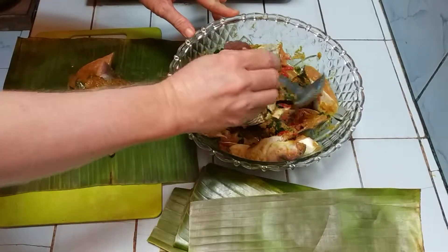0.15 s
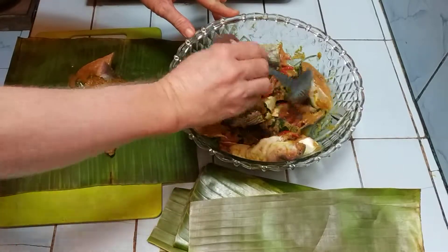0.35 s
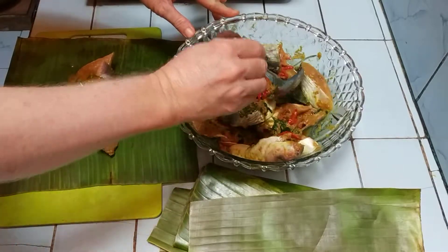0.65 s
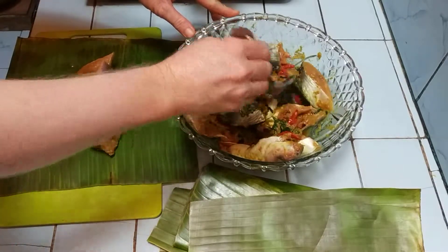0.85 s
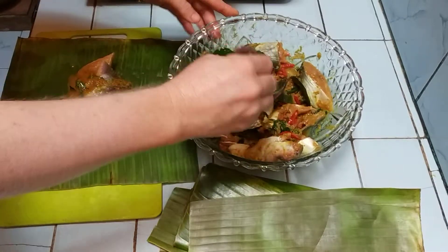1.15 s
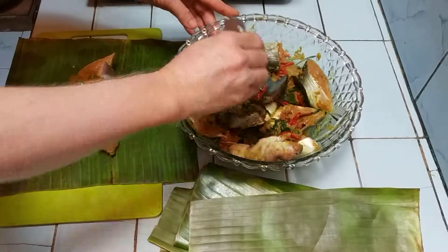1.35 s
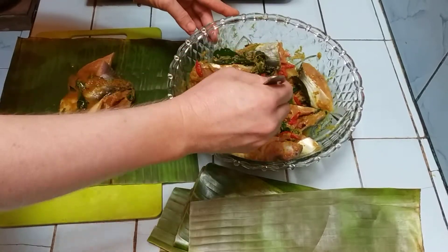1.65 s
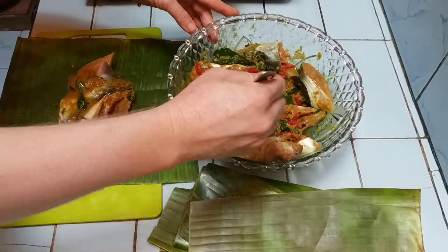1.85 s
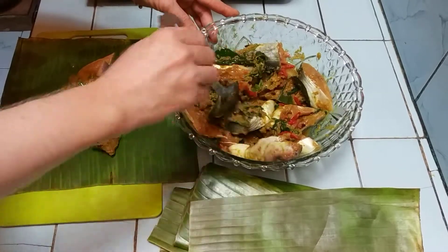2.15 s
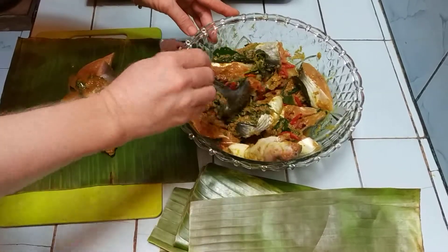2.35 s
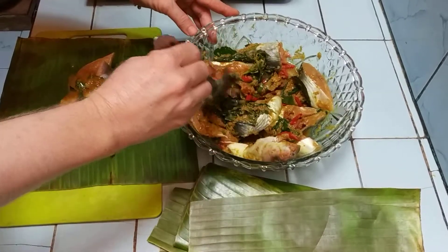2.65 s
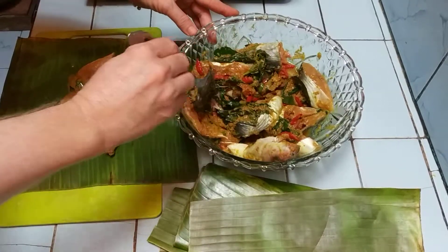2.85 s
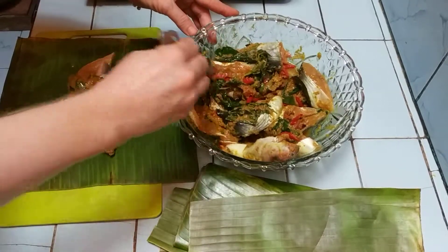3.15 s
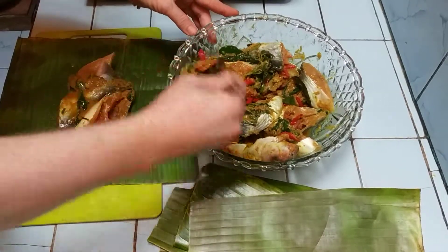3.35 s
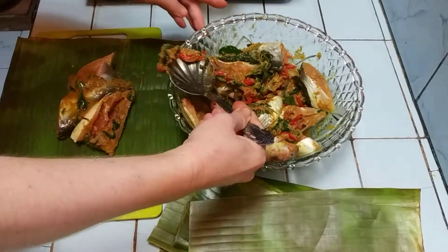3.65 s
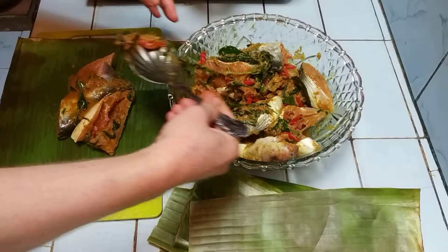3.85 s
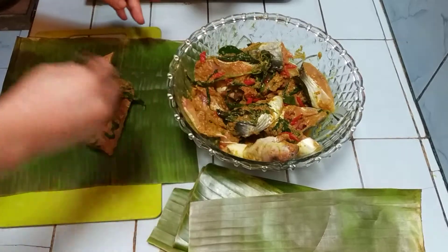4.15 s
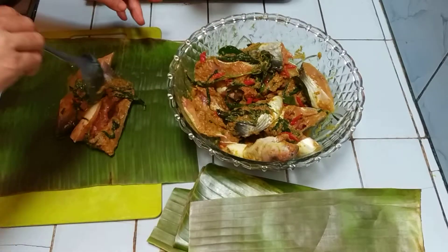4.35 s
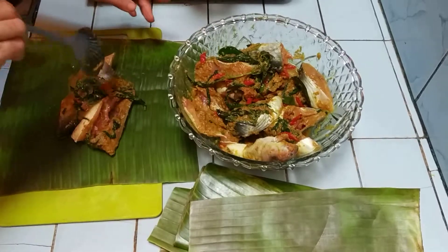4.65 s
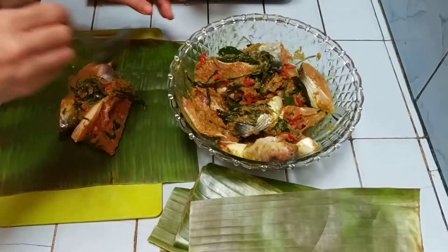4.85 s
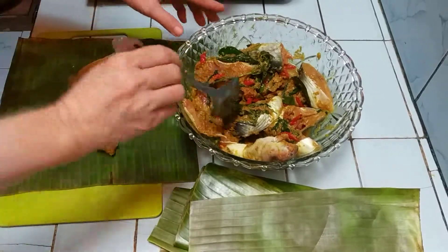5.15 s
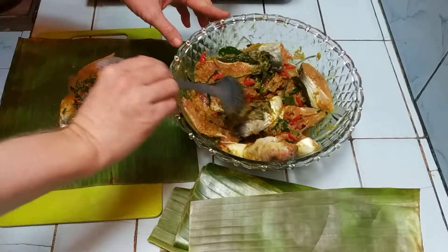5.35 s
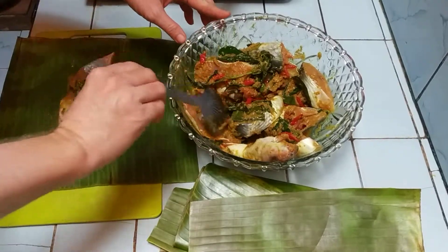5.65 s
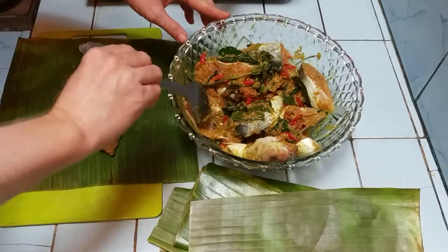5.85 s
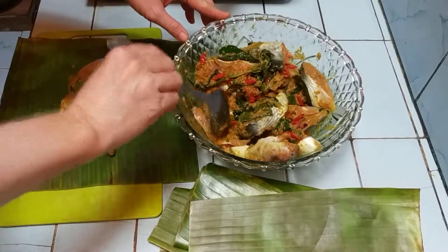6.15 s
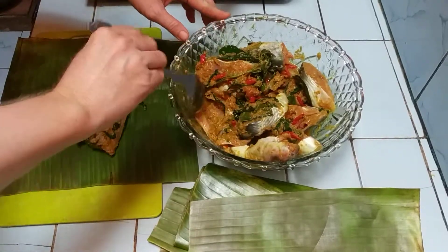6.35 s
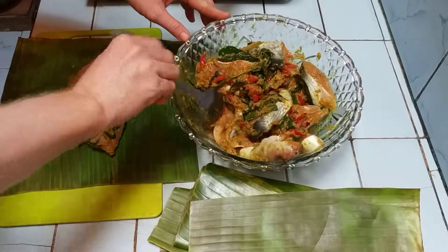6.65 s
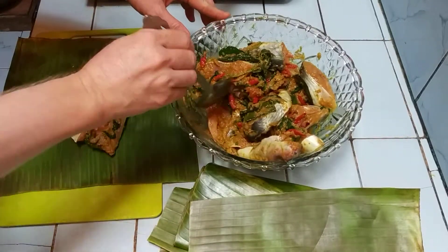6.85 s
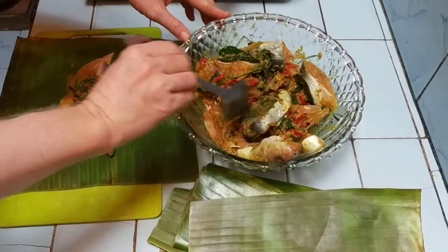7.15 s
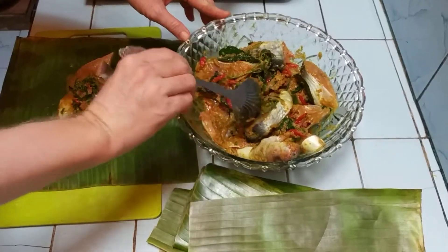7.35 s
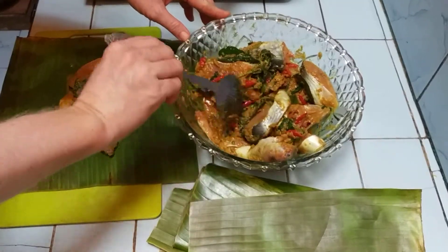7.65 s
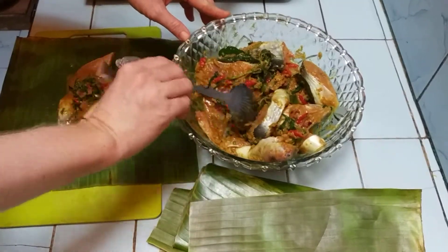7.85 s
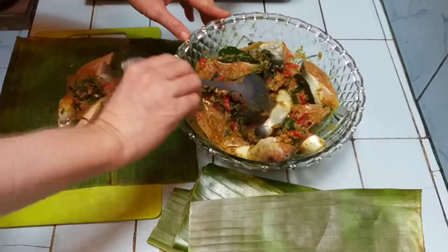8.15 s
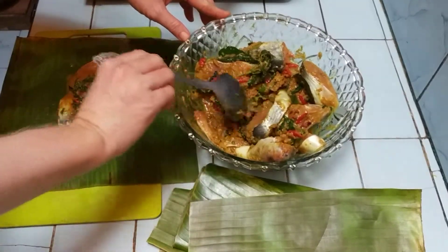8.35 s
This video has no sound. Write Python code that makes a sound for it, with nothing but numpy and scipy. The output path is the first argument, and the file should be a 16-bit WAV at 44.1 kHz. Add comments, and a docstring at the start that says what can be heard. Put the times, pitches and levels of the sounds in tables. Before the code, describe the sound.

A small, tiled kitchen holds a steady low rush of air and a faint hiss, heard close in stereo. A steel spoon works through wet, saucy food with fine crackles, tiny bubble pops and light clicks. The heavy glass bowl rocks on the counter with resonant thuds at about 0.4, 1.0, 1.1, 1.3 and 1.5 seconds. Sharper ticks come near 1.6 and 2.7, then short hollow, raspy scrapes around 3.05 to 3.3. At 4.0 a spoonful lands on a leaf-covered board in dull wet slaps with a low boom. A quieter stretch follows, with four faint grainy hiss swells from 4.2 to 5.4. Bowl knocks resume at 5.7 and 6.4; a bright glass clink rings at 6.4, with another contact at 6.5 damping it. A very brief sinking squeak comes at 6.8, then crackles, ticks and muffled thuds from 7.2 to the end.

```python
"""A low rush and a faint hiss fill a small hard kitchen as a steel spoon digs through crackling wet food.
Its heavy glass bowl rocks and knocks on the tiled counter: resonant thuds, noise clacks and decaying modes.
A spoonful tumbles onto a leaf on a board: grain slaps over a boom; narrow grainy hiss then swells four times.
Later the spoon clinks on the rim (modal ring and crack) and squeaks along the glass (a sinking tone).
Light clicks and a faint singing of the spoon come between; decaying noise makes the room's answer."""
import sys
import numpy as np
from scipy import signal
from scipy.fft import rfft, irfft, next_fast_len
from scipy.io import wavfile
from scipy.ndimage import map_coordinates

SR = 44100
rng = np.random.default_rng(int(sys.argv[2]) if len(sys.argv) > 2 else 0)


def waveform_to_disk(signal):
    """Save audio, clipped to [-1, 1], as 16-bit WAV at the path in sys.argv[1]."""
    frames = np.transpose(np.atleast_2d(signal))
    scaled = np.clip(frames, -1, 1) * 32767
    samples = np.round(scaled).astype(np.int16)
    wavfile.write(sys.argv[1], SR, samples)


N = 374318


def amp(db):
    """Decibels to gain."""
    return 10 ** (np.asarray(db) / 20)


def unit(x):
    """Scale to rms 1."""
    return x / np.sqrt(np.mean(x ** 2) + 1e-20)


def clock(size):
    """Seconds for each sample."""
    return np.arange(size) / SR


def along(points, hz):
    """Interpolate (Hz, value) points on a log axis."""
    f, v = np.transpose(points)
    return np.interp(np.log(hz + 1), np.log(f + 1), v)


def wobble(rate):
    """A smooth random curve, rate knots a second."""
    knots = rng.standard_normal(int(N * rate / SR) + 4)
    return map_coordinates(knots, [clock(N) * rate])


def filtered(x, response):
    """x times a complex response of frequency."""
    size = x.shape[-1]
    m = next_fast_len(size + SR // 4)
    return irfft(rfft(x, m) * response(np.fft.rfftfreq(m, 1 / SR)), m)[..., :size]


def resonance(f, centre, width):
    """Causal response of one resonance."""
    return 1j * f * width / (centre ** 2 - f ** 2 + 1j * f * width)


def add(track, s, sound):
    """Mix a sound in at time s."""
    part = track[..., max(0, round(s * SR)):][..., :sound.shape[-1]]
    part += sound[..., :part.shape[-1]]


def swell(s, db, rise, t60, hold=0):
    """A level that builds up to time s, holds and then dies away."""
    t = clock(N) - s
    build = np.exp(-(t / rise) ** 2 / 2)
    decay = amp(-60 * np.maximum(t - hold, 0) / t60)
    return amp(db) * np.where(t < 0, build, decay)


def grains(rate):
    """Random tiny impulses, rate a second."""
    return rng.standard_normal(N) * (rng.random(N) < rate / SR)


def ring(modes, t, scatter_db):
    """Decaying modes, each reaching the two microphones with its own strength and phase."""
    out = np.zeros((2, len(t)))
    for hz, db, t60 in modes:
        phase = rng.uniform(0, 2 * np.pi) + rng.normal(0, 0.87, (2, 1))
        level = amp(db + rng.normal(0, scatter_db, (2, 1)) - 60 * t / t60)
        out += level * np.sin(2 * np.pi * hz * t + phase)
    return out


# left-right likeness of diffuse sound: freq_hz, likeness (0-1)
LIKENESS = [(60, 0.94), (250, 0.91), (500, 0.83), (1000, 0.15), (3000, 0.029), (12000, 0.014)]


def diffuse(size):
    """White stereo noise from all around: alike in the bass, unrelated in the treble."""
    def mid_side_gains(hz):
        turn = np.arccos(np.clip(along(LIKENESS, hz), -1, 1)) / 2
        return np.array([np.cos(turn), np.sin(turn)])
    mid, side = filtered(rng.standard_normal((2, size)), mid_side_gains)
    return np.array([mid + side, mid - side])


# kitchen reverberation: freq_hz, t60_s
KITCHEN_DECAY = [(100, 0.39), (500, 0.22), (1200, 0.29), (2400, 0.44), (7000, 0.32), (14000, 0.4)]


def in_room(x, wet_db, lag_s=0.000095):
    """A short sound, reaching the left microphone a little late, and the kitchen's answer."""
    hz, t, z = signal.stft(diffuse(SR // 2), SR, nperseg=256)
    build = 1 - np.exp(-(t / 0.00067) ** 2)
    decay = amp(-60 * t / along(KITCHEN_DECAY, hz)[:, None])
    tail = signal.istft(z * build * decay, SR, nperseg=256)[1]
    echo = signal.fftconvolve(np.atleast_2d(x), tail / np.linalg.norm(tail[0]), axes=1)
    # half the lag each way
    direct = filtered(x, lambda f: np.exp(-1j * np.pi * f * lag_s * np.array([[1], [-1]])))
    return direct + amp(wet_db) * echo[:, :x.shape[-1]]


# steady low air spectrum: freq_hz, relative_db
RUSH_SPECTRUM = [(12, -8), (21, 1.5), (35, -1.5), (70, -13), (141, -6.5), (230, -17), (300, -11.5),
                 (450, -8), (650, -23), (800, -15), (1100, -21.5), (1500, -30), (2200, -63), (3300, -80)]
# room resonances in that air: centre_hz, width_hz, relative_db
DRONE_MODES = [(141.7, 51, -5.5), (429.7, 19.3, 2.5), (575.8, 40, -4)]
# hiss spectrum: freq_hz, relative_db
HISS_SPECTRUM = [(710, 6), (1200, 1.5), (1610, 2), (1890, 3.5), (2040, 2), (2680, -2.5), (3080, -4),
                 (4600, -7), (9010, 0), (14500, -2), (16000, -6.5)]
RUSH_DB, DRONE_DB, HISS_DB = -44.5, -51, -49


def background():
    """A gently drifting low rush of air, coloured by room resonances, and an even hiss."""
    def drone_response(f):
        return sum(amp(db) * resonance(f, hz, width) ** 2 for hz, width, db in DRONE_MODES)
    rush = unit(filtered(diffuse(N), lambda f: amp(along(RUSH_SPECTRUM, f))))
    drone = unit(filtered(diffuse(N), drone_response))
    hiss = unit(filtered(diffuse(N), lambda f: amp(along(HISS_SPECTRUM, f))))
    drift_db = wobble(7.4)
    return amp(RUSH_DB + drift_db) * rush + amp(DRONE_DB) * drone + amp(HISS_DB) * hiss


# spoon pushes through the sauce: height_s, crackle_db
SAUCE_STROKES = [(0.01, -48), (.45, -57), (.54, -50), (.785, -52), (1.16, -60), (1.31, -53), (1.64, -59),
                 (2.47, -53), (3.07, -59), (3.24, -52.5), (4.04, -51.5), (7.11, -51.5), (7.2, -53),
                 (7.46, -54), (7.63, -54), (7.98, -60)]
# largest bubbles burst: start_s, level_db, pitch_hz
LARGE_POPS = [(.7778, -33, 5360), (1.135, -37, 7840), (1.171, -24.5, 6630), (2.957, -25, 5980),
              (5.7065, -34, 4700)]
STROKE_RISE_S, STROKE_T60_S = 0.017, 0.27
SETTLING_DB = -52.5  # crackle between pushes
BUBBLES_PER_S, BUBBLE_HZ = 7, 8960
BUBBLE_LOG_SPREAD = 0.23
BUBBLE_DB = 10  # small bubbles, over the crackle level


def sauce():
    """Each push of the spoon makes the sauce crackle in clumps, and bubbles burst with a tiny ping."""
    pushes = sum(swell(s, db, STROKE_RISE_S, STROKE_T60_S) for s, db in SAUCE_STROKES)
    stir = amp(SETTLING_DB) + pushes
    clumping = amp(4 * np.tanh(.5 * wobble(22) + wobble(70)))
    clumps = np.array([grains(rate=680), grains(rate=600)]) * clumping
    wet_grains = filtered(clumps, lambda f: resonance(f, 7870, 15400) ** 2)
    crackle = unit(in_room(wet_grains, wet_db=5.0))

    large, small, t = np.zeros(N), np.zeros(N), clock(SR // 20)
    ping_level = amp(-60 * t / 0.018) * (1 - np.exp(-t / 0.0007))

    def ping(hz):
        return ping_level * np.sin(2 * np.pi * hz * t)
    for s, db, hz in LARGE_POPS:
        add(large, s, amp(db) * ping(hz))
    pitches_hz = BUBBLE_HZ * np.exp(BUBBLE_LOG_SPREAD * rng.standard_normal(N))
    for i in np.flatnonzero(rng.random(N) < BUBBLES_PER_S / SR):
        add(small, i / SR, ping(pitches_hz[i]))
    bubbles = large + amp(BUBBLE_DB) * stir * small
    return stir * crackle + in_room(bubbles, wet_db=-11)


# bowl rocks onto the counter, at times touching twice:
# start_s, level_db, boom_relative_db, thud_hz, clack_relative_db
BOWL_KNOCKS = [(0.3625, -33, -2, 480, -18), (0.3971, -15, -5, 500, -19), (0.3999, -21.5, -10, 800, -9),
               (.9573, -23.5, 7.5, 510, -9), (0.9604, -14.5, -1, 630, -9.5), (1.1001, -15, -4.5, 457, -15),
               (1.3383, -25, 9, 460, -3), (1.3433, -17, 0, 463, -10.5), (1.3565, -24.5, 12.5, 600, -9),
               (1.5114, -16, -6, 460, -16), (5.6997, -19, -2, 550, -20), (5.7028, -31.5, -6, 655, -2),
               (6.4374, -16.5, -0.5, 450, -12), (7.2776, -23.5, 6, 496, -21), (7.4187, -29.5, 11, 350, -10),
               (7.5721, -15, -4, 470, -11), (7.9485, -19, -6, 470, -12), (8.1093, -29, -9, 392, -19),
               (8.365, -24, -6, 486, -27)]
# bowl and counter modes together: freq_hz, relative_db, t60_s
BODY_MODES = [(194, -12.5, 0.19), (286, -1.5, 0.12), (320, -4, 0.18), (402, -12.5, 0.36),
              (456, -1.5, 0.066), (522.5, 3, 0.096), (609, 5.5, 0.042), (665, 3, 0.054), (960, -15, 0.11),
              (1220, -27, 0.084), (1530, -27, 0.028), (1830, -23, .05)]
# reflections off nearby tiled walls: delay_s, relative_db
WALL_ECHOES = [(.00465, -3.5), (.016, -11.5), (0.0267, -18.5)]


def knocks(soft_hz=1100, clack_hz=1250, clack_width_hz=1500, clack_t60_s=0.014,
           thud_width_hz=760, low_hz=90, boom_hz=94):
    """The bowl's foot drops on the tiles: a round thud, a hard clack and a short ring, off the walls too."""
    out, t = np.zeros((2, N)), clock(SR // 2)
    impulse = 1. * (t == 0)

    def walls(f):
        return 1 + sum(amp(db) * np.exp(-2j * np.pi * f * delay) for delay, db in WALL_ECHOES)
    for s, db, boom_db, thud_hz, clack_db in BOWL_KNOCKS:
        burst = amp(-60 * t / clack_t60_s) * rng.standard_normal(len(t))
        clack = filtered(burst, lambda f: resonance(f, clack_hz, clack_width_hz) ** 3)
        thud = filtered(impulse, lambda f: resonance(f, thud_hz, thud_width_hz) ** 3 / (1 + 1j * f / 3000))
        modes = sum(amp(level + rng.normal(0, 3.0) - 60 * t / t60) * np.sin(2 * np.pi * hz * t)
                    for hz, level, t60 in BODY_MODES)
        body = 0.22 * filtered(modes, lambda f: 1 / (1 + 1j * f / soft_hz) ** 2)
        contact = thud / np.abs(thud).max() + amp(clack_db) * clack / np.abs(clack).max() + body
        knock = -filtered(contact, lambda f: (1j * f / (low_hz + 1j * f)) ** 2)
        reflected = filtered(knock / np.abs(knock).max(), walls)
        boom = amp(boom_db - 24.5 - 60 * t / 0.5) * np.sin(2 * np.pi * boom_hz * t)
        add(out, s, amp(db) * (in_room(reflected, wet_db=-4.0, lag_s=0.00024) + boom))
    return out


# spoon slides over the glass: height_s, level_db
GLASS_DRAGS = [(.43, -51), (5.48, -45.5), (7.98, -49.5)]
DRAG_HZ, DRAG_WIDTH_HZ, DRAG_RISE_S, DRAG_T60_S = 7140, 100, 0.019, 0.13


def drags():
    """Sliding over the glass keeps the spoon's strongest mode singing faintly."""
    zing = unit(filtered(grains(rate=760), lambda f: resonance(f, DRAG_HZ, DRAG_WIDTH_HZ) ** 2))
    level = sum(swell(s, db, DRAG_RISE_S, DRAG_T60_S) for s, db in GLASS_DRAGS)
    return in_room(zing * level, wet_db=-6)


# light touches of the spoon's edge: start_s, level_db, centre_hz, clack_relative_db
EDGE_TICKS = [(.7776, -28.5, 9400, -16), (1.0166, -31, 12500, -20), (1.4012, -21.5, 7000, 1),
              (1.6266, -16, 11800, -20), (2.7110, -22.5, 8600, -13), (2.7285, -21.5, 8500, -11),
              (2.7715, -23, 8500, -14), (3.053, -29, 2900, -10), (3.0706, -27, 9000, -12),
              (4.165, -28, 8300, -6), (5.5313, -28, 7100, -8), (5.947, -34, 2200, -4),
              (6.789, -29, 9000, -12), (6.8185, -26, 3500, 0), (7.2225, -27.5, 1200, 6),
              (7.6352, -29.5, 3100, -10), (7.8865, -28.5, 12000, -20)]


def ticks(clack_hz=1500):
    """The spoon's edge grazes the glass too lightly to ring it; a dull clack lies under each click."""
    out, t = np.zeros((2, N)), clock(SR // 2)
    fade = amp(-60 * t / .016)
    for s, db, hz, clack_db in EDGE_TICKS:
        def colour(f):
            return resonance(f, hz, 0.35 * hz) + amp(clack_db) * resonance(f, clack_hz, clack_hz) ** 2
        click = filtered(fade * rng.standard_normal((2, len(t))), colour)
        add(out, s, amp(db) * in_room(click / np.abs(click).max(), wet_db=-5.5))
    return out


# spoon drags through the food: height_s, relative_db, rise_s, t60_s, centre_hz, rasp_relative_db
FOOD_SCRAPES = [(3.05, -32.5, 0.007, 0.16, 590, -3), (3.196, -32.5, 0.009, 0.17, 450, -6),
                (3.268, -43, 0.016, 0.64, 570, -1.5), (7.17, -58.5, 0.075, 0.22, 780, 9)]
# dry rasp spectrum: freq_hz, relative_db
RASP_SPECTRUM = [(200, -38), (900, 13.5), (2000, 8.5), (3500, -9.5), (6000, -29), (16000, -35)]


def scrapes():
    """The spoon drags through soft food: a hollow rub with a dry rasp above it."""
    out = np.zeros(N)
    for s, db, rise, t60, hz, rasp_db in FOOD_SCRAPES:
        friction = grains(rate=1800)
        rub = unit(filtered(friction, lambda f: resonance(f, hz, 0.7 * hz) ** 2))
        rasp = unit(filtered(friction, lambda f: amp(along(RASP_SPECTRUM, f))))
        out += swell(s, db, rise, t60) * (rub + amp(rasp_db) * rasp)
    return amp(-1) * in_room(out, wet_db=-3.0, lag_s=0.00033)


# lumps of the spoonful slide off and land: height_s, relative_db, rise_s, t60_s
LUMP_SLIDES = [(3.93, -39, 0.04, 0.48), (3.988, -29, 0.0028, 0.23), (4.039, -26.5, 0.024, 0.21),
               (4.095, -34, 0.028, 0.5)]
# wet slap spectrum: freq_hz, relative_db
MUSH_SPECTRUM = [(30, -32), (60, -20), (140, 0), (230, -19), (300, -11), (385, 3.5), (450, -5),
                 (600, -11.5), (790, -5), (950, -15), (1500, -19.5), (2100, -24.5), (5200, -35.5),
                 (12000, -47), (16000, -55)]
LANDING_S, BOOM_DB, BOOM_HZ = 4.003, -21, 94
BOOM_RISE_S, BOOM_HOLD_S, BOOM_T60_S = 0.011, 0.092, 0.39
UPPER_RATIO, UPPER_DB = 1.49, -16  # counter's second mode, over its first
FIRST_LUMP_S, FIRST_LUMP_DB = 3.935, -31  # lighter boom as the first lump arrives


def food(uneven_db=1.0):
    """The spoonful lands as a flurry of dull slaps, which chatter in step with the booming counter."""
    landing = swell(LANDING_S, BOOM_DB, BOOM_RISE_S, BOOM_T60_S, BOOM_HOLD_S)
    weight = landing + swell(FIRST_LUMP_S, FIRST_LUMP_DB, 0.011, BOOM_T60_S)
    phase = 2 * np.pi * np.cumsum(BOOM_HZ * (1 + 0.024 * wobble(24.88))) / SR
    sway = unit(filtered(rng.standard_normal(N), lambda f: resonance(f, 29, 30) ** 2))
    counter = np.sin(phase) + amp(UPPER_DB) * np.sin(UPPER_RATIO * phase) + 0.16 * sway
    boom = weight * amp(uneven_db * wobble(40)) * counter
    slaps = grains(rate=2200) * (1 + 0.57 * np.sin(phase))
    dull_slaps = filtered(slaps, lambda f: amp(along(MUSH_SPECTRUM, f)))
    mush = unit(in_room(dull_slaps, wet_db=3.0, lag_s=0.0003))
    return amp(1.0) * sum(swell(*slide) for slide in LUMP_SLIDES) * mush + boom


# faint narrow hiss swells: start_s, level_db, hold_s
HISS_SWELLS = [(4.233, -58.5, 0.17), (4.565, -60.5, .16), (4.91, -61, .19), (5.34, -58.5, 0.099)]
SWELL_HZ, SWELL_WIDTH_HZ, SWELL_RISE_S, SWELL_T60_S = 3280, 800, 0.028, 0.3


def hiss_swells():
    """Faint narrow hiss: grainy band-passed noise rising and fading four times."""
    clumps = np.array([grains(rate=900), grains(rate=900)]) * amp(5 * np.tanh(wobble(45)))
    band = unit(filtered(clumps, lambda f: resonance(f, SWELL_HZ, SWELL_WIDTH_HZ) ** 2))
    return band * sum(swell(s, db, SWELL_RISE_S, SWELL_T60_S, hold) for s, db, hold in HISS_SWELLS)


# main modes of the glass: freq_hz, relative_db, t60_s
GLASS_MODES = [(2184, -11, .37), (3085, -24, .3), (3389, -8, .42), (3426, -11, .3), (4810, -14, .27),
               (4863, -7.5, .28), (5677, -29, .3), (6500, -8, .24), (6980, -20, .2), (7198, -8, .23),
               (7284, -13, .18), (8328, -4, .22), (8374, -10.5, .24), (8802, -25, .25), (10392, -10.5, .2),
               (10775, -12, .22), (11620, -15, .14), (12620, -19, .16), (12940, -21, .2), (13350, -21, .14),
               (15400, -19, .13)]


def side_modes(db, spread_hz, life, count):
    """The cut pattern of the glass crowds weaker, shorter modes around each main one."""
    return [(hz + spread_hz * rng.standard_normal(), level + db, life * t60)
            for hz, level, t60 in GLASS_MODES for _ in range(count)]


# spoon strikes the rim, then lands on it; two faint dull claps follow:
# start_s, ring_relative_db, crack_relative_db, clack_relative_db
RIM_CLINKS = [(6.3972, -9, -9, -16), (6.5025, -23, -8.5, -5), (6.519, -39, -40, -12),
              (6.538, -44, -40, -13)]
# held spoon, quickly damped by the fingers: freq_hz, relative_db, t60_s
SPOON_MODES = [(1215, -26, 0.2), (1710, -19, 0.043), (2410, -19, 0.046), (6600, -9, 0.026),
               (7210, 1, 0.026), (8340, -8, 0.04), (10800, -10.5, .04), (13000, -16, 0.04)]
CHOKE_T60_S = .3  # extra decay from the resting spoon


def clinks(clack_hz=1900, clack_width_hz=2900):
    """Steel on glass: a crack, the spoon's zing and the bowl's ring, choked once the spoon stays on the rim."""
    out, t = np.zeros((2, N)), clock(SR // 2)
    modes = GLASS_MODES + side_modes(db=-15, spread_hz=140, life=0.55, count=6)
    landing_s = RIM_CLINKS[1][0]

    def burst(t60):
        return amp(-60 * t / t60) * rng.standard_normal((2, len(t)))

    def snap_response(f):
        return sum(amp(db / 2) * resonance(f, hz, 800) ** 2 for hz, db, t60 in GLASS_MODES)
    for s, ring_db, crack_db, clack_db in RIM_CLINKS:
        resting_s = np.maximum(s + t - landing_s, 0)
        choke = amp(ring_db - 5.5 - 60 * resting_s / CHOKE_T60_S)
        glass = choke * ring(modes, t, scatter_db=3.5)
        snap = filtered(burst(0.01), snap_response)
        crack = amp(crack_db) * (2.1 * snap + ring(SPOON_MODES, t, scatter_db=0))
        dull = filtered(burst(0.021), lambda f: resonance(f, clack_hz, clack_width_hz) ** 3)
        add(out, s, in_room(glass, wet_db=-7.5, lag_s=0.00009))
        add(out, s, in_room(crack, wet_db=-4, lag_s=0.00014))
        add(out, s, in_room(amp(clack_db) * dull, wet_db=-8.0))
    return out


# squeak overtones: multiple, relative_db
SQUEAK_OVERTONES = [(2, -6.5), (3, -7), (4, -25.5)]
SQUEAK_S, SQUEAK_HZ = 6.8138, 2430  # height of the press, mean pitch there
SQUEAK_DB, SQUEAK_WIDTH_S = -14, 0.004  # width: gaussian sigma
SAG_HZ_PER_S, HARDEN_DB_PER_S, EDGE_DB = 7400, 1100, -2


def squeak():
    """A brief stick-slip tone that sinks in pitch and hardens as the spoon presses."""
    t = np.clip(clock(N) - SQUEAK_S, -.03, .03)
    press = np.exp(-(t / SQUEAK_WIDTH_S) ** 2 / 2)
    hz = (SQUEAK_HZ - SAG_HZ_PER_S * t) * (1 + 0.02 * wobble(900))
    phase = 2 * np.pi * np.cumsum(hz) / SR
    edge = amp(EDGE_DB + HARDEN_DB_PER_S * t + 2.0 * wobble(700))
    overtones = sum(amp(level) * np.sin(round(k) * phase) for k, level in SQUEAK_OVERTONES)
    tone = np.sin(phase) + edge * overtones
    grit = unit(filtered(grains(rate=5800), lambda f: resonance(f, 2000, 2100) ** 2))
    return in_room(amp(SQUEAK_DB) * press * (tone + 0.071 * grit), wet_db=-11.5)


def scene():
    """Everything on the counter, in the room's air."""
    bowl_and_spoon = knocks() + drags() + ticks() + clinks() + squeak()
    wet_food = sauce() + scrapes() + food()
    return background() + bowl_and_spoon + wet_food + hiss_swells()


# microphone balance: freq_hz, left_minus_right_db
MIC_BALANCE = [(100, -0.5), (600, 0.1), (3000, 1.5), (8000, -0.5), (10500, 3.5), (13000, 9), (16000, 2)]
TOP_HZ = 16000


def record(dry):
    """The left microphone is brighter; peaks clip at full scale and the band is limited."""
    def balance(f):
        half_db = along(MIC_BALANCE, f) / 2
        return amp(np.array([half_db, -half_db]))
    heard = filtered(dry, balance)
    return filtered(np.clip(heard, -1, 1), lambda f: f < TOP_HZ)


dry = scene()
out = record(dry)
waveform_to_disk(out)
```